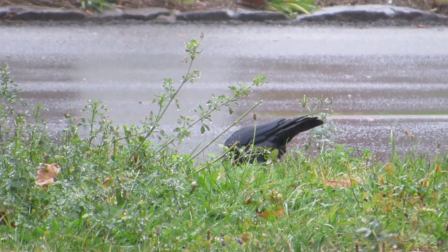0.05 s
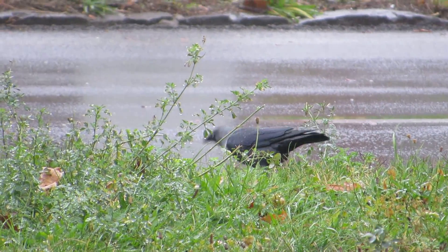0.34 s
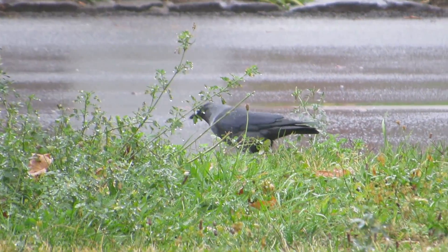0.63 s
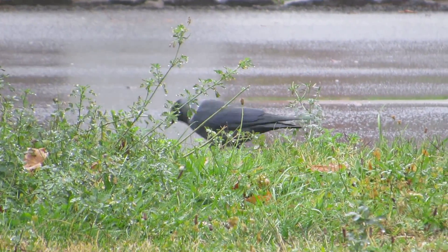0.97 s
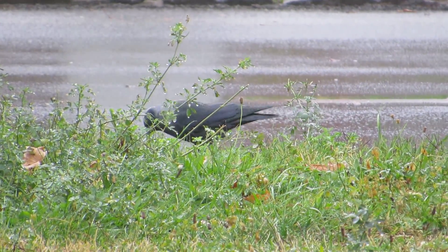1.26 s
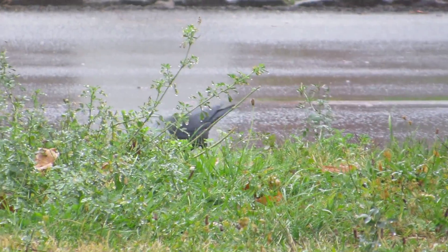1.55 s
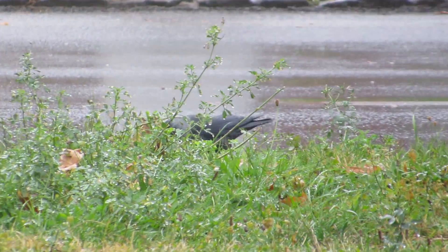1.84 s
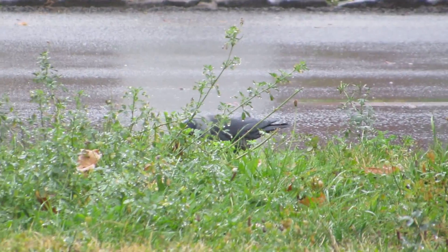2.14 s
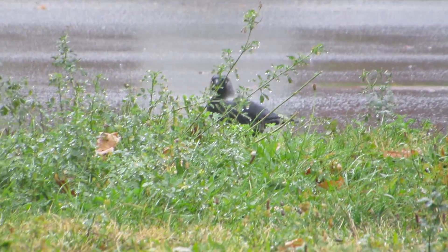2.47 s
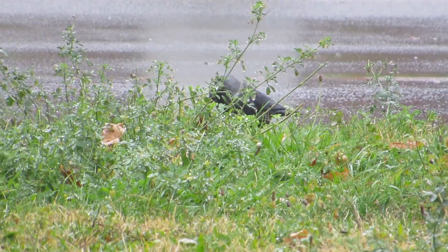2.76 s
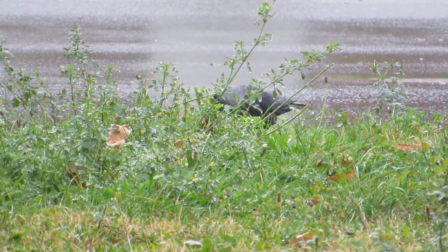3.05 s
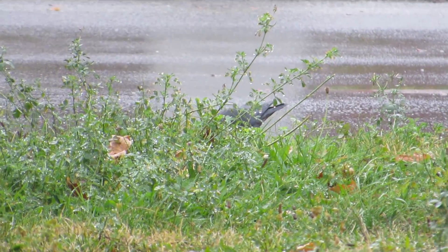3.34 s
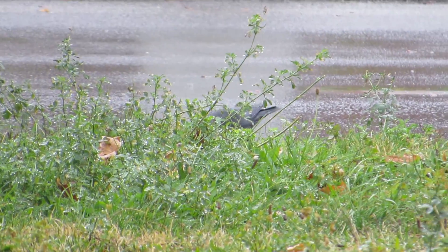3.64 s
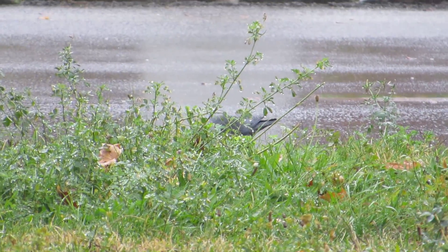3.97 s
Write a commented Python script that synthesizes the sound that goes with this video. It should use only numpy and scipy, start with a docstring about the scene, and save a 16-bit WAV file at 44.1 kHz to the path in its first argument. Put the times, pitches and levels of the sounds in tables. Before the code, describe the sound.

Rain falls on an umbrella close by for all four seconds, big drops tapping irregularly over a dense patter and a soft hiss from the wet road. Wind buffets the microphone throughout with a low rumble, thumping loudly at about 0.2, 0.6 and 0.9 seconds, repeatedly from 1.3 to 1.7, then near 2.4 and 3.1. The rain dips and the taps thin out around 1.5 to 2 seconds.

```python
"""Rain beside a wet road: big drops tap something taut close by, probably an umbrella.
Each drop makes the surface spring back and splashes with a tick. Behind them are a dense patter,
fine spray and the wash of rain further off. Wind eddies buffet the microphone, pushing its two
sides in opposite directions; the recorder's limiter catches the strongest buffets."""
import sys
import numpy as np
from scipy import signal
from scipy.fft import rfft, irfft
from scipy.io import wavfile
from scipy.ndimage import uniform_filter1d, minimum_filter1d

SR = 44100
rng = np.random.default_rng(int(sys.argv[2]) if len(sys.argv) > 2 else 0)


def pcm_store(signal):
    """Save signal as 16-bit PCM."""
    levels = np.round(np.clip(np.atleast_2d(signal), -1, 1) * 32767)
    wavfile.write(sys.argv[1], SR, levels.astype(np.int16).T)


N = 176400


def amp(db):
    """Decibels to gain."""
    return 10 ** (np.asarray(db) / 20)


def unit_rms(x):
    """Scales to rms 1."""
    return x / np.sqrt(np.mean(x ** 2) + 1e-20)


def curve(points):
    """Interpolates a time table, one value per sample."""
    return np.interp(np.arange(N) / SR, *np.transpose(points))


def at_hz(points, hz):
    """Interpolates a table on a log-frequency axis."""
    f, value = np.transpose(points)
    return np.interp(np.log(hz + 1), np.log(f + 1), value)


def colour(x, spectrum):
    """Filters by a table of Hz and dB."""
    hz = np.fft.rfftfreq(x.shape[-1], 1 / SR)
    return irfft(rfft(x) * amp(at_hz(spectrum, hz)), x.shape[-1])


def low_cut(x, hz):
    """Second-order high-pass."""
    return signal.sosfilt(signal.butter(2, hz, "high", fs=SR, output="sos"), x)


def slow_noise(first_samples, second_samples):
    """Noise smoothed by two moving averages, rms 1."""
    return unit_rms(uniform_filter1d(uniform_filter1d(rng.standard_normal(N), first_samples),
                                     second_samples))


def add(mix, start_s, sound):
    """Mixes in a stereo sound."""
    part = mix[:, max(round(start_s * SR), 0):][:, :sound.shape[1]]
    part += sound[:, :part.shape[1]]


def scatter(starts_s, sounds, pan_db):
    """Places each sound at its time and side; pan is left minus right."""
    out = np.zeros((2, N))
    panned = sounds * amp(pan_db[:, None, None] * np.array([[.5], [-.5]]))
    for start_s, sound in zip(starts_s, panned):
        add(out, start_s, sound)
    return out


def ticks(count, spectrum, decay_s, correlation, samples=256):
    """Decaying stereo noise bursts of equal energy."""
    a, b = colour(rng.standard_normal((2, count, samples)), spectrum)
    fade = np.exp(-np.arange(samples) / SR / decay_s)
    burst = np.stack([a, correlation * a + np.sqrt(1 - correlation ** 2) * b], axis=1) * fade
    return burst * np.sqrt(np.mean(fade ** 2) / np.mean(burst ** 2, axis=(1, 2), keepdims=True))


# Distant rain. Each row: frequency in Hz, relative density in dB.
WASH_SPECTRUM = [(30,9.5),(120,10.5),(400,-5.5),(800,1.5),(1300,3.5),(2200,0.5),(3400,-2.5),(5000,-9),(7300,-7.5),(9000,-13.5),(13000,-14)]
# Its stereo image. Each row: frequency in Hz, left-right correlation.
WASH_CORRELATION = [(100,0.96),(1200,0.41),(3400,0.39),(5500,0.17),(7500,-0.51),(9000,-0.84),(13000,-0.5)]


def wash(level_db=-39.5, flicker_db=1.0):
    """Rain on road and grass merges into a lightly flickering hiss."""
    a, b = rfft(rng.standard_normal((2, N)))
    correlation = at_hz(WASH_CORRELATION, np.fft.rfftfreq(N, 1 / SR))
    noise = irfft(np.array([a, correlation * a + np.sqrt(1 - correlation ** 2) * b]), N)
    hiss = unit_rms(colour(noise, WASH_SPECTRUM))
    return hiss * amp(level_db + flicker_db * slow_noise(900, 400))


# Droplet tick. Each row: frequency in Hz, relative density in dB.
SPRAY_SPECTRUM = [(500,-22),(2000,-3),(4000,0),(7000,0),(9000,-2),(13000,-2.5)]


def spray(per_s=150, candidates=1000, floor_db=-42.5, spread_db=5, range_db=13, pan_spread_db=4):
    """Droplets thrown up by the splashes land as tiny bright ticks, left and right."""
    when, chance, size_draw = rng.random((3, candidates))
    pan_db = pan_spread_db * rng.standard_normal(candidates)
    level_db = floor_db + np.minimum(-spread_db * np.log(size_draw), range_db)
    sounds = ticks(candidates, SPRAY_SPECTRUM, decay_s=.0002, correlation=0)
    sounds *= amp(level_db)[:, None, None]
    lands = chance < per_s * N / SR / candidates
    return scatter(when[lands] * N / SR, sounds[lands], pan_db[lands])


# Splash tick. Each row: frequency in Hz, relative density in dB.
SPLASH_SPECTRUM = [(300,-25),(1500,-2),(3000,1.5),(5000,-1.5),(7300,-1.5),(9000,-4),(13000,-4)]
TAP_GAIN_DB, SPLASH_GAIN_DB = 6, 4
TAP_DECAY_CYCLES, UPPER_MODE_RATIO, UPPER_MODE_DB = .64, 2.06, -4.5


def impacts(tap_db, pitch_hz, splash_db, samples=256):
    """Under each drop the surface dips and springs back within a cycle or two; the water splashes."""
    def mode(cycles):
        return -np.sin(2 * np.pi * cycles) * np.exp(-cycles / TAP_DECAY_CYCLES)

    cycles = pitch_hz[:, None, None] * np.arange(samples) / SR
    attack = 1 - np.exp(-4 * cycles)
    tap = mode(cycles) * attack + amp(UPPER_MODE_DB) * mode(cycles * UPPER_MODE_RATIO)
    tap *= 2 * amp(tap_db + TAP_GAIN_DB)[:, None, None]
    splash = ticks(len(pitch_hz), SPLASH_SPECTRUM, decay_s=.00055, correlation=.65)
    return tap + amp(splash_db + SPLASH_GAIN_DB)[:, None, None] * splash


PATTER_HZ, PATTER_SPREAD_OCTAVES = 1666, .54
PATTER_SPLASH_DB, PATTER_SPLASH_SPREAD_DB = -14, 3


def patter(per_s=400, candidates=2400, floor_db=-41, spread_db=5.4, range_db=10.5, pan_spread_db=3):
    """Many small drops strike at random places, a few of them larger."""
    when, chance, size_draw = rng.random((3, candidates))
    pitch, wetness, pan = rng.standard_normal((3, candidates))
    tap_db = floor_db + np.minimum(-spread_db * np.log(size_draw), range_db)
    splash_db = tap_db + PATTER_SPLASH_DB + PATTER_SPLASH_SPREAD_DB * wetness
    sounds = impacts(tap_db, PATTER_HZ * 2 ** (PATTER_SPREAD_OCTAVES * pitch), splash_db)
    lands = chance < per_s * N / SR / candidates
    return scatter(when[lands] * N / SR, sounds[lands], pan_spread_db * pan[lands])


def canopy(hits, ring_db=-13, t60_s=.03, rise_s=.00089, samples=3000):
    """The taut surface shivers briefly after each drop and radiates little bass."""
    t = np.arange(samples) / SR
    noise = rng.standard_normal((3, samples))  # left, right, shared
    tail = (noise[:2] + noise[2]) * amp(-60 * t / t60_s) * np.minimum(t / rise_s, 1)
    ring = signal.oaconvolve(hits, tail / np.linalg.norm(tail[0]), axes=1)[:, :N]
    return low_cut(hits + amp(ring_db) * ring, hz=480)


# Light wind between buffets. Each row: time in seconds, level in dB.
BREEZE_LEVEL = [(0,-24.5),(.4,-35.5),(.72,-22),(.82,-36),(.98,-19.5),(1.08,-34),(1.38,-20.5),(1.6,-24),(2.04,-28.5),(2.22,-17),(2.36,-29),(2.55,-22.5),(2.8,-38.5),(3.05,-19),(3.25,-35),(3.42,-38.5),(3.78,-22.5),(3.85,-31.5),(4,-33)]
# Buffets. Each row: centre in seconds, length in seconds, level in dB.
WIND_BUFFETS = [(0.053, 0.0094, -33), (0.233, 0.014, -14), (0.32, 0.025, -19), (0.428, 0.0051, -16),
                (0.612, 0.0079, -12), (0.629, 0.04, -12.5), (0.675, 0.0074, -12), (0.738, 0.036, -11.5),
                (0.911, 0.018, -8), (0.945, 0.027, -11), (1.152, 0.032, -19.5), (1.199, 0.026, -21),
                (1.297, 0.044, -14.5), (1.394, 0.014, -7.5), (1.422, 0.021, -9.5), (1.503, 0.0083, -26),
                (1.531, 0.014, -13), (1.559, 0.027, -19), (1.66, 0.013, -13), (1.673, 0.0083, -12),
                (1.697, 0.03, -12), (1.776, 0.023, -24.5), (1.882, 0.014, -16.5), (1.942, 0.016, -18.5),
                (1.972, 0.013, -18), (2.1, 0.011, -22.5), (2.161, 0.034, -16), (2.226, 0.011, -33),
                (2.247, 0.031, -10.5), (2.275, 0.023, -31), (2.326, 0.01, -14.5), (2.443, 0.039, -16.5),
                (2.483, 0.026, -17), (2.571, 0.024, -9), (2.639, 0.02, -19), (2.664, 0.042, -21.5),
                (2.976, 0.013, -17.5), (3.008, 0.02, -18), (3.03, 0.0065, -27), (3.063, 0.0094, -11),
                (3.081, 0.015, -13), (3.117, 0.0071, -17.5), (3.169, 0.021, -16.5), (3.317, 0.072, -22),
                (3.369, 0.017, -23), (3.474, 0.011, -20.5), (3.513, 0.016, -17), (3.531, 0.013, -17.5),
                (3.592, 0.054, -21.5), (3.74, 0.013, -12.5), (3.762, 0.043, -16), (3.881, 0.016, -17)]
# Light air, then a hard buffet. Each row: frequency in Hz, relative density in dB.
SOFT_SPECTRUM = [(15,-40),(40,-2),(90,8),(200,0),(350,-5.5),(500,-27),(800,-62),(1500,-45),(4000,-48.5)]
HARD_SPECTRUM = [(15,-15),(40,-7.5),(90,0.5),(200,3),(350,-3),(500,-10.5),(750,-21.5),(1100,-49),(2000,-54),(5000,-79)]
# Lean across the microphone. Each row: time in seconds, left minus right in dB.
WIND_BALANCE = [(0,-3.5),(1,-2.5),(2,-3),(3,2.5),(4,2.5)]
# Turbulence each side feels alone. Each row: frequency in Hz, dB relative to the shared push.
SIDE_TURBULENCE = [(60,-19),(250,-17.5),(500,-12),(900,-7),(2000,-3)]


def wind(soft_db=-24, hard_db=-16, lump_db=4.5, lump_s=.02, steady_s=.0139, skew=.1):
    """Lumpy turbulence pushes the microphone's sides in opposition; harder buffets are brighter."""
    t = np.arange(N) / SR
    span = int(lump_s * SR)
    lumps = np.minimum(slow_noise(span, span // 2), 1)
    power = amp(curve(BREEZE_LEVEL) + lump_db * lumps) ** 2
    for centre_s, length_s, db in WIND_BUFFETS:
        power += amp(db) ** 2 * np.exp(-np.log(4) * (2 * (t - centre_s) / length_s) ** 2)
    hardness = np.clip((10 * np.log10(power) - soft_db) / (hard_db - soft_db), 0, 1)
    air = rng.standard_normal((3, N))  # shared, left, right
    soft, hard = unit_rms(colour(air, SOFT_SPECTRUM)), unit_rms(colour(air, HARD_SPECTRUM))
    eddies = (1 - hardness) * soft + hardness * hard
    eddies /= np.sqrt(uniform_filter1d(eddies ** 2, int(steady_s * SR)) + .0066)  # evens the level
    push = eddies[0] + skew * (eddies[0] ** 2 - 1)  # pushes are sharper than pulls
    lean = amp(curve(WIND_BALANCE) / 2)
    sides = np.array([-lean * push, push / lean])
    pressure = np.sqrt(power) * (sides + colour(eddies[1:], SIDE_TURBULENCE))
    return low_cut(pressure, hz=32.7)  # the microphone's low cut


# Big drops. Each row: start in seconds, relative tap level in dB, pitch in Hz,
# relative splash level in dB.
CLOSE_DROPS = [(0.0652, -27, 1490, -44), (0.0855, -26.5, 1290, -51), (0.094, -27, 1430, -45),
               (0.118, -24.5, 884, -28), (0.149, -26, 1350, -34), (0.1554, -19, 1130, -28.5),
               (0.178, -24.5, 1270, -39), (0.1892, -19, 1430, -32), (0.1966, -27, 1570, -37),
               (0.306, -47, 1330, -30), (0.364, -31, 1230, -38), (0.4048, -28, 1340, -35),
               (0.434, -27, 1370, -42), (0.5104, -23.5, 1150, -26.5), (0.5173, -35, 1130, -38),
               (0.557, -32, 1490, -47), (0.574, -25, 1510, -37), (0.5897, -23.5, 1150, -32),
               (0.5985, -22.5, 1070, -29), (0.6123, -18, 1440, -45), (0.7128, -30, 1480, -47),
               (0.7195, -43, 1820, -27.5), (0.724, -26.5, 985, -45), (0.7672, -28, 1740, -37),
               (0.8135, -27.5, 1440, -48), (0.8184, -28, 1350, -27.5), (0.8544, -26, 1450, -28),
               (0.902, -19, 1330, -28.5), (0.976, -27.5, 1160, -29.5), (1.0258, -22, 970, -32),
               (1.0374, -25, 1530, -35), (1.1563, -29, 2030, -26.5), (1.162, -23.5, 1230, -31),
               (1.174, -29.5, 1340, -40), (1.2265, -30, 1370, -35), (1.2318, -24, 1680, -28),
               (1.2674, -26, 1240, -44), (1.2745, -24, 1660, -34), (1.331, -45, 1280, -32),
               (1.388, -25.5, 1290, -36), (1.6588, -25, 1300, -35), (1.8994, -27.5, 1610, -53),
               (1.9727, -27, 1440, -41), (2.1127, -23.5, 1310, -31), (2.1455, -24.5, 1990, -34),
               (2.1548, -19.5, 1580, -27.5), (2.337, -32.5, 1560, -36), (2.462, -26.5, 1390, -35),
               (2.4967, -28, 1490, -37), (2.5087, -27, 1480, -30), (2.5307, -38, 1290, -37),
               (2.6766, -29, 2000, -41), (2.7385, -29, 1260, -34), (2.785, -39, 1330, -30),
               (2.8326, -40, 1580, -30.5), (2.8548, -35, 1250, -28.5), (2.9066, -25, 1710, -37),
               (2.919, -28.5, 1250, -37), (2.9701, -23.5, 1260, -24.5), (3.0981, -34, 1400, -31),
               (3.1155, -24, 1350, -44), (3.227, -29, 1590, -32), (3.2679, -21.5, 1890, -36),
               (3.3036, -26, 1650, -27), (3.4165, -41, 1300, -51), (3.4876, -27, 1430, -53),
               (3.492, -25.5, 1170, -30), (3.5318, -22.5, 1500, -28.5), (3.6478, -25, 1700, -35),
               (3.6857, -29.5, 1510, -32), (3.722, -27.5, 1010, -29.5), (3.8581, -30, 1090, -33),
               (3.8806, -28.5, 1130, -30.5), (3.9039, -22.5, 1670, -34), (3.9149, -20.5, 1330, -31)]


def close_drops(pan_db=-3.5):
    """Big drops strike the surface close by, slightly to the right."""
    starts_s, tap_db, pitch_hz, splash_db = np.transpose(CLOSE_DROPS)
    return scatter(starts_s, impacts(tap_db, pitch_hz, splash_db), np.full(len(starts_s), pan_db))


# Eddies hitting the microphone squarely. Each row: centre in seconds, level in dB, pitch in Hz.
WIND_KNOCKS = [(0.2311,4.5,220),(0.608,-7,287),(0.629,0,250),(0.671,-6,275),(0.741,-15,287),(0.904,-6,315),(0.948,-2,219),(1.296,1,174),(1.311,-4.5,370),
               (1.392,-2.5,320),(1.427,-2,263),(1.473,-6.5,275),(1.652,-2.5,228),(1.697,-2.5,255),(1.7136,3,360),(2.447,-1,307),(3.081,0,338)]


def wind_knocks(width_cycles=.6, left_db=-3.5, samples=500):
    """A pressure front builds, flips and relaxes: opposite on the two sides, stronger on the right."""
    out = np.zeros((2, N))
    for centre_s, db, pitch_hz in WIND_KNOCKS:
        cycles = pitch_hz * (np.arange(samples) - samples / 2) / SR
        window = np.exp(-(cycles / width_cycles) ** 2)
        pulse = -np.tanh(10 * cycles) * np.cos(np.pi * cycles) * window
        add(out, centre_s - samples / 2 / SR, amp(db) * np.array([-amp(left_db) * pulse, pulse]))
    return out


# Level of the rain as heard: the recorder's gain ducks it after strong gusts, then it recovers.
# Each row: time in seconds, level in dB (unity gain at DUCKING_UNITY_DB).
RAIN_DUCKING = [(0,-43),(.2,-40.5),(.25,-46.5),(.6,-44.5),(.66,-46.5),(1.1,-46.5),(1.2,-43.5),(1.44,-48.5),(1.66,-48),(1.73,-51),(1.92,-49.5),(2.12,-45),(2.28,-47),(2.5,-45.5),(3.05,-42.5),(3.38,-46),(4,-46)]
DUCKING_UNITY_DB = -43


def scene():
    """Wind and close drops over wash, spray and patter; those three follow the ducking curve."""
    ducking = amp(curve(RAIN_DUCKING) - DUCKING_UNITY_DB)
    buffeting = wind() + wind_knocks()
    background = ducking * (wash() + spray())
    return buffeting + background + canopy(close_drops() + ducking * patter())


# Dips in the recorder's response. Each row: centre in Hz, half-width in Hz, gain in dB.
RESPONSE_DIPS = [(3963,91,-14.5),(8100,25,-24)]
# Treble roll-off. Each row: frequency in Hz, gain in dB.
TREBLE_ROLLOFF = [(13000,0),(13700,-4),(14300,-13),(15000,-25),(16000,-36)]


def record(dry, limit_db=-.5, recovery_db_per_s=150, edge_hz=15700):
    """A quick limiter catches the buffets; the recorder's response and band limit follow."""
    over_db = np.maximum(20 * np.log10(abs(dry).max(0) + 1e-9) - limit_db, 0)
    recovery_db = np.arange(N) / SR * recovery_db_per_s
    held_db = np.maximum.accumulate(over_db + recovery_db) - recovery_db
    limited = dry * amp(uniform_filter1d(minimum_filter1d(-held_db, size=41), size=41))
    hz = np.fft.rfftfreq(N, 1 / SR)
    dips_db = sum(db / (1 + ((hz - centre) / width) ** 2) for centre, width, db in RESPONSE_DIPS)
    coloured = irfft(rfft(limited) * amp(dips_db + at_hz(TREBLE_ROLLOFF, hz)), N)
    low_pass = signal.firwin(511, edge_hz, window=("kaiser", 9), fs=SR)
    return signal.oaconvolve(coloured, low_pass[None], "same")


dry = scene()
out = record(dry)
pcm_store(out)
```